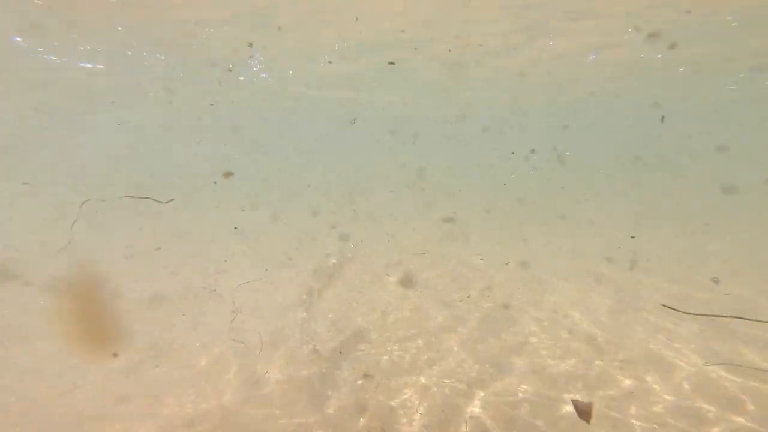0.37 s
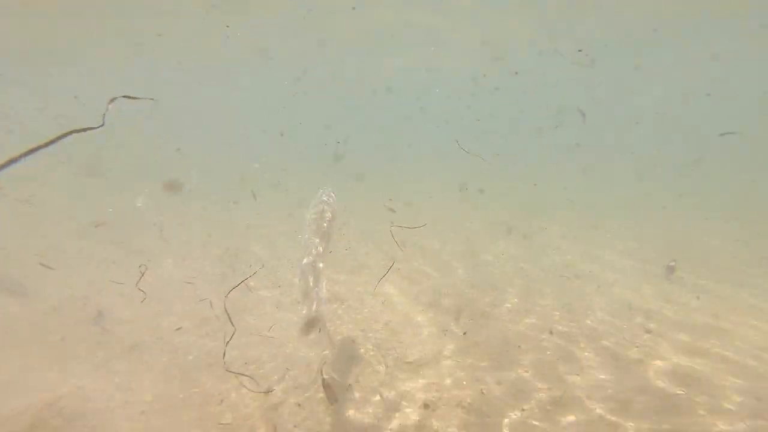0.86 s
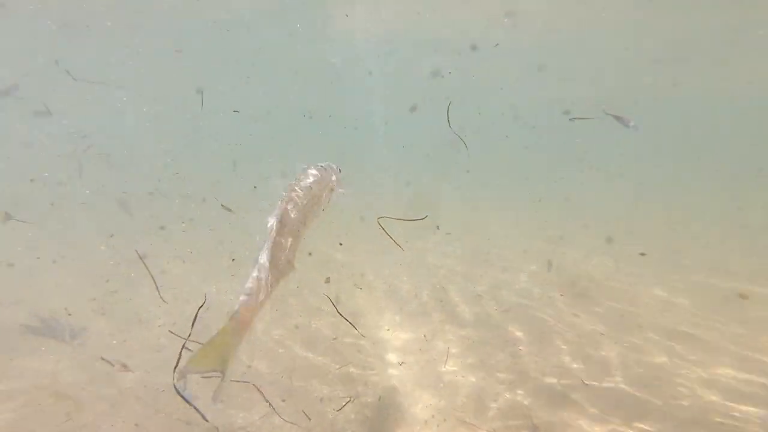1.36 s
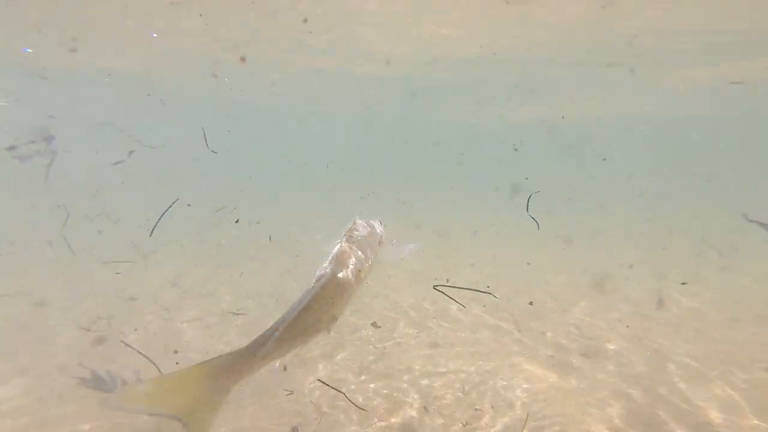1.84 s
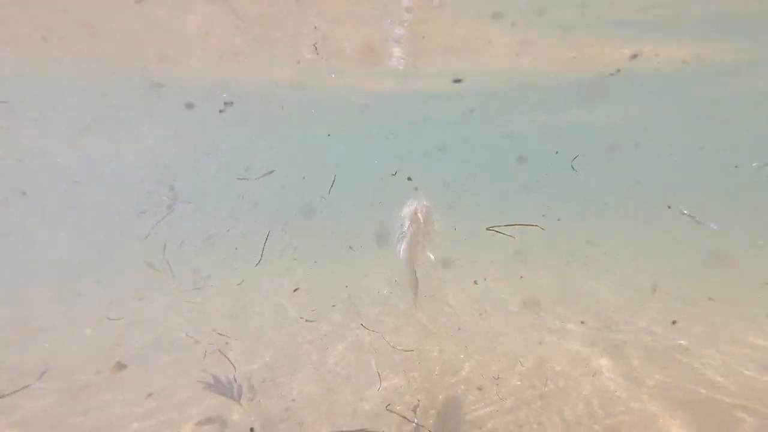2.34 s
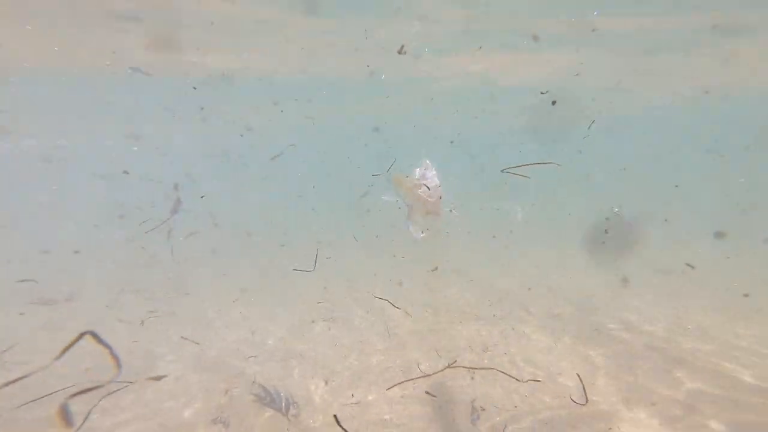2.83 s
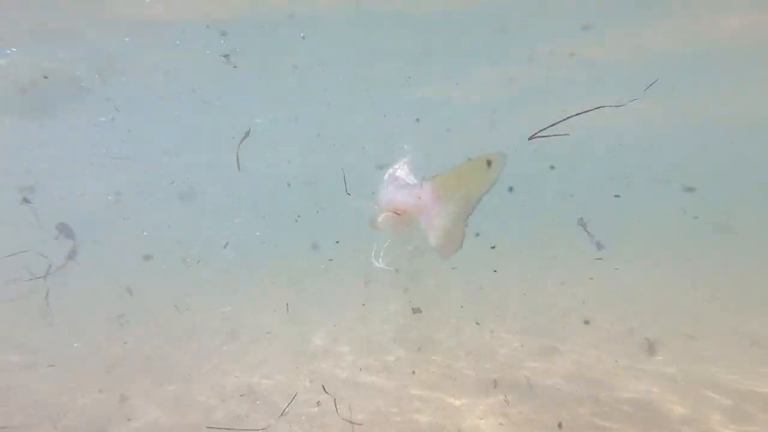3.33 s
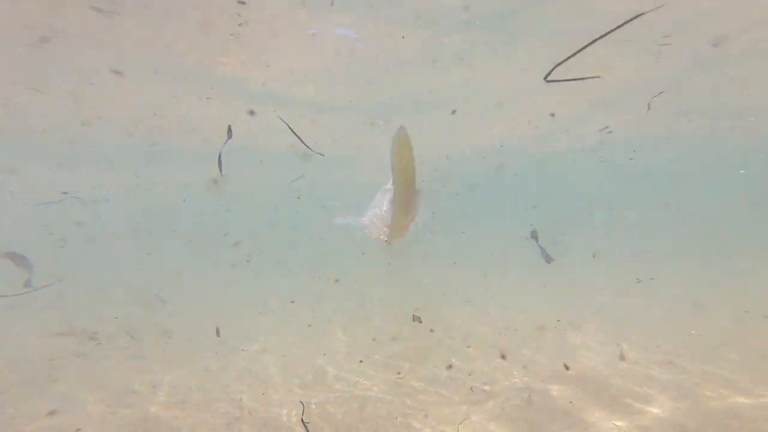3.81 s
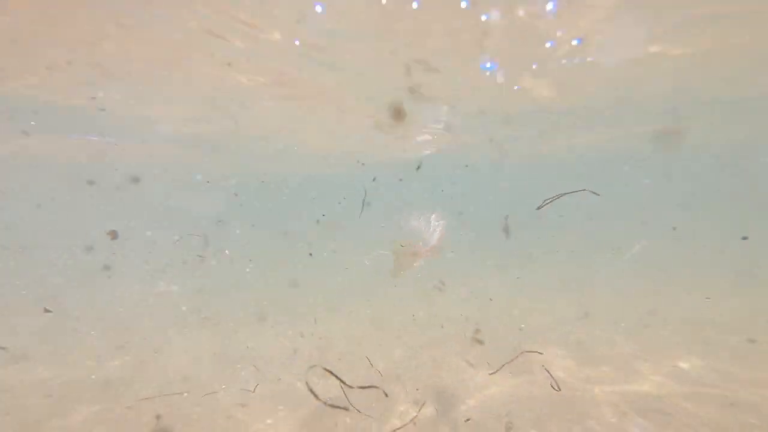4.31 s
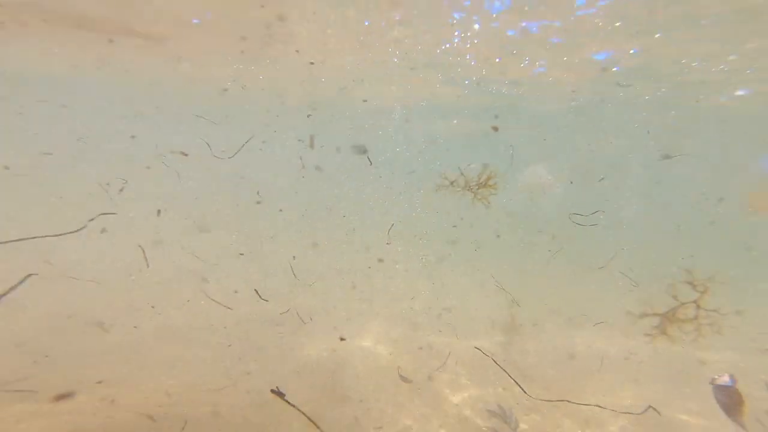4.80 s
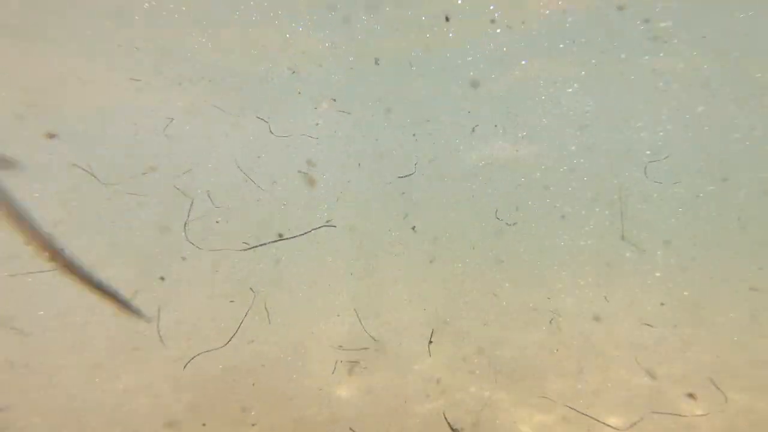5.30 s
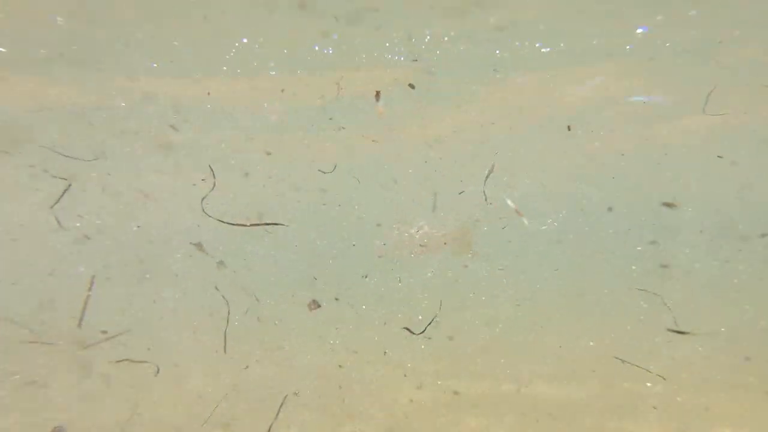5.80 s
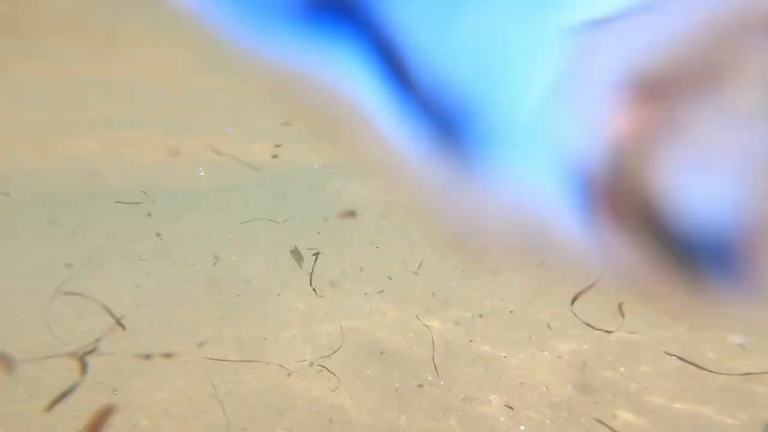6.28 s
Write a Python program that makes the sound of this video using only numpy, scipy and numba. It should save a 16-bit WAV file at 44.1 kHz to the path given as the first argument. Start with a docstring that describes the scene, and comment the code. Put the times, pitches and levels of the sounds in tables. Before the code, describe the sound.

Heard from inside a sealed housing just under the sea surface: low, muffled rumble swells and sloshes while trapped air rings hollowly around one kilohertz. Isolated bloops and glugs come at first, then a quieter lull, a few hollow knocks, and a violent cluster of slaps, thumps and bright clicks around four and a half seconds. More glugging bubbles follow near five, then it sinks to a faint smooth rush with a tick at the end.

```python
"""Surges of a shallow sea push on the microphone membrane of a sealed camera housing just under the surface.
The push is rumbling noise with a grainy slosh above it and a smooth low rush in the lull.
Trapped air, shaken by small knocks, rings at a pitch that follows the water level; water slaps the shell.
Bubbles and glugs are short dying tones, and grit ticks are high rings with a crack of noise.
Foam and sand wash past as clumps of tiny bursts."""
import sys
import numpy as np
from scipy import signal
from scipy.io import wavfile
from numba import njit

SR = 44100
rng = np.random.default_rng(int(sys.argv[2]) if len(sys.argv) > 2 else 0)


def nominal_scale(level):
    """Amplitude ratio for a level in decibels (scalar or array-like)."""
    x = np.asarray(level, float) / 20
    return 10 ** x


def dump(signal):
    """Clip the signal to [-1, 1] and save it as 16-bit WAV at the path in sys.argv[1]."""
    limited = np.clip(np.atleast_2d(signal).T, -1, 1)
    pcm = np.round(limited * 32767).astype(np.int16)
    wavfile.write(sys.argv[1], SR, pcm)


N = 282433  # length in samples

# Uneven push of the swell on the membrane. Each row: time in seconds, rumble gain in dB.
SURGE_CURVE = [(0, -31.5), (.55, -34.5), (.87, -36.5), (1.5, -32), (1.76, -37), (2.1, -33.5), (2.7, -33.5),
               (3.35, -32), (4.3, -31.5), (4.6, -32.5), (4.69, -44.5), (4.95, -47.5), (5.3, -30),
               (5.52, -47.5), (5.86, -47), (6.4, -49)]
# Colour of the rumble. Each row: frequency in Hz, relative strength per Hz in dB.
RUMBLE_COLOUR = [(8.8, -33.5), (15, 2), (43, 4), (65, 5.5), (145, -8), (222, -15), (261, -27), (400, -27.5),
                 (520, -38.5), (880, -120)]
# Single shoves of water. Each row: peak time in seconds, rumble gain in dB,
# time to build up by 20 dB in seconds (values under 0.01 count as 0.01).
SHOVES = [(1.12, -24, 0.18), (2.028, -26, 0.1), (2.62, -28.5, 0.7), (3.03, -33, 0), (4.1, -30.5, 0.13),
          (4.22, -24.5, -0.05), (4.51, -16, 0.06), (4.74, -18.5, 0.08), (4.85, -31, -3.4),
          (5.2, -27.5, 0.4), (5.372, -22, -0.2), (6.11, -32, 0.17), (6.34, -28, 0.15)]
SHOVE_FALL_DB_PER_S = 240.5
# Slosh of the water. Each row: time in seconds, gain in dB.
SLOSH_CURVE = [(0, -45.5), (.16, -48), (.42, -43), (.47, -27.5), (.58, -65), (.87, -44.5), (1.12, -35),
               (1.22, -41), (1.32, -32.5), (1.6, -38.5), (1.77, -48.5), (1.93, -42.5), (2.1, -43),
               (2.39, -49.5), (2.53, -43), (2.61, -22.5), (2.67, -52), (2.96, -50), (3.04, -41.5),
               (3.35, -54.5), (4.01, -50), (4.1, -25.5), (4.21, -30.5), (4.28, -35.5), (4.5, -49),
               (4.57, -55.5), (5.15, -54), (5.26, -40.5), (5.52, -56), (6.15, -47.5), (6.4, -47)]
# Colour of the slosh. Each row: frequency in Hz, relative strength per Hz in dB.
SLOSH_COLOUR = [(88, -28), (150, -6), (392, -7.5), (697, -11.5), (900, -15.5), (1170, -29.5), (1980, -120)]
# Smooth low rush in the lull. Each row: time in seconds, level in dB.
RUSH_CURVE = [(5.7, -74), (5.83, -55), (5.95, -41.5), (6.27, -42), (6.32, -60)]
# Band of the rush: lower edge in Hz, upper edge in Hz.
RUSH_BAND_HZ = [130, 408]

# How strongly the air pocket in the port rings. Each row: time in seconds, gain in dB.
POCKET_CURVE = [(0, -64), (.19, -36), (.27, -46), (.31, -52), (.365, -41), (.38, -35), (.6, -36.5),
                (.69, -51), (.89, -38.5), (1.24, -37), (1.3, -20.5), (1.5, -35.5), (2.46, -51.5),
                (2.7, -37), (2.77, -57.5), (3.06, -39), (3.3, -55), (3.65, -38), (4.03, -40), (4.09, -27),
                (4.37, -39), (4.56, -63.5), (4.87, -39.5), (4.935, -47), (4.96, -39), (5.13, -38),
                (5.2, -31), (5.28, -34), (5.4, -40), (5.62, -52), (6.26, -55), (6.38, -33)]
# Pitch of the air pocket, before a small wobble. Each row: time in seconds, pitch in Hz.
POCKET_PITCH = [(0, 1083), (.2, 1260), (.28, 1600), (.33, 1300), (.37, 1166), (1.28, 1085), (1.5, 1086),
                (2.7, 1133), (3.6, 1088), (3.8, 943), (3.92, 1036), (4.4, 1135), (4.7, 1038), (4.95, 905),
                (5.13, 910), (5.24, 808), (5.43, 943), (6.26, 954), (6.4, 1141)]
# The pocket rings more purely once the housing has dipped again.
# Each row: time in seconds, width in Hz of each of its two resonances in a row.
POCKET_WIDTH = [(0, 246.4), (4.7, 268), (4.88, 101), (6.2, 70.6), (6.4, 254)]
# More air spaces that ring for a while as the housing nears the surface and dips again, one list each.
# Each row: time in seconds, pitch in Hz, gain in dB.
SIDE_POCKETS = [
    [(0.28, 2500, -68), (0.335, 2346, -61), (0.49, 2444, -67)],
    [(4.72, 3620, -88), (5.2, 3650, -74.5)],
    [(4.36, 1895, -60), (4.42, 2000, -40), (4.47, 2170, -47), (4.52, 2160, -54), (4.6, 2030, -51.5),
     (4.7, 1930, -48.5), (4.74, 1810, -37.5), (4.8, 1510, -60), (4.86, 1510, -60.5), (4.93, 1600, -80)],
    [(4.56, 3750, -83), (4.63, 3650, -49), (4.66, 3430, -65), (4.705, 3600, -40), (4.73, 3740, -60)],
    [(4.8, 677, -34), (4.86, 686, -30.5), (4.93, 652, -57), (4.96, 664, -37.5), (5.11, 667, -45),
     (5.278, 738, -51.5), (5.336, 609, -49), (5.42, 690, -58)],
]
# Width in Hz of each resonance, one value for each side pocket.
SIDE_WIDTHS_HZ = [39.6, 110, 260, 600, 75]
# Rough sound let through below the pitch: dB relative to the ring, one value for each side pocket.
SIDE_BODY_DB = [-30, -30, 1, -10, -12]

# Water slapping the shell. Each row: start in seconds, dull noise in dB and bright noise in dB
# (both before filtering), time to die by 60 dB in seconds.
SLAPS = [(0.24, -22, -25, 0.095), (0.377, -21, -62, 0.06), (1.237, -30, -34, 0.024),
         (1.289, -12, -33, 0.019), (2.059, -23, -40, 0.05), (2.075, -32, -35, 0.017),
         (2.09, -24, -30, 0.012), (2.19, -21, -38, 0.056), (2.287, -16, -44, 0.015),
         (3.109, -29.5, -30, 0.022), (3.613, -23, -62, 0.041), (3.671, -22.5, -48, 0.061),
         (3.689, -25.5, -47, 0.088), (3.794, -13, -57, 0.015), (3.837, -2, -50, 0.015),
         (4.043, -16.5, -43.5, 0.061), (4.105, -5, -67, 0.02), (4.383, 0, -31, 0.0049),
         (4.434, -31, -18, 0.011), (4.474, -10.5, -28, 0.051), (4.486, -15.5, -23, 0.014),
         (4.509, -18.5, -52, 0.062), (4.526, -19, -46, 0.029), (4.554, -9, -50, 0.017),
         (4.588, -39, -14.5, 0.01), (4.625, -42.5, -17, 0.0051), (4.633, -40, -18, 0.0092),
         (4.639, -19, -28, 0.031), (4.694, -2.5, -19, 0.011), (4.704, -25, -23, 0.02),
         (4.716, -16, -47, 0.0098), (4.751, 6.5, -46, 0.0081), (4.843, -6.5, -40, 0.022),
         (4.853, -8, -50, 0.0069), (5.169, -26, -82, 0.022), (5.23, -7, -44, 0.022),
         (5.717, -26, -52, 0.029), (6.218, -36.5, -45, 0.082), (6.371, -34, -22, 0.027)]
SLAP_RISE_S = 0.0003
# Each slap also shakes the pocket for a moment.
SLAP_TO_POCKET_DB, POCKET_AFTER_T60_S, POCKET_AFTER_RISE_S = -17.5, 0.067, 0.00095

# Bubbles and rings of trapped air. Each row: rough time in seconds, peak in dB before wobble,
# starting pitch in Hz, time to die by 60 dB in seconds.
BUBBLES = [(0.183, -26, 1250, 0.019), (0.377, -24, 1080, 0.026), (0.898, -31, 1150, 0.13),
           (1.147, -28, 874, 0.068), (1.254, -23.5, 820, 0.022), (1.294, -27.5, 1077, 0.073),
           (1.307, -10.5, 1045, 0.03), (1.336, -21.5, 1167, 0.13), (1.377, -28, 1175, 0.07),
           (1.515, -24, 1156, 0.03), (1.695, -30, 1217, 0.03), (1.732, -28, 1280, 0.032),
           (1.85, -31.5, 676, 0.091), (1.921, -28, 1151, 0.089), (2.055, -29.5, 990, 0.037),
           (3.318, -27, 1111, 0.088), (3.329, -14, 1156, 0.06), (3.329, -31.5, 1705, 0.03),
           (3.64, -33.5, 484, 0.08), (3.794, -9.5, 743, 0.036), (3.797, -35, 1518, 0.086),
           (3.81, -22, 645, 0.092), (3.836, -18.5, 1250, 0.028), (3.854, -19, 1006, 0.03),
           (3.997, -29, 796, 0.035), (4.045, -19, 710, 0.022), (4.073, -24.5, 1186, 0.082),
           (4.124, -18, 910, 0.019), (4.15, -19.5, 750, 0.032), (4.384, -17, 1285, 0.024),
           (4.436, -15, 1737, 0.018), (4.474, -28, 1090, 0.026), (4.695, -12, 1092, 0.034),
           (4.732, -21.5, 953, 0.045), (4.743, -8, 940, 0.035), (4.756, -10.5, 729, 0.076),
           (4.774, -16, 744, 0.13), (4.841, -17.5, 1013, 0.027), (4.852, -36.5, 1490, 0.07),
           (4.919, -50, 1750, 0.04), (4.953, -29.5, 932, 0.045), (4.992, -27, 850, 0.12),
           (5.098, -24, 967, 0.027), (5.155, -25, 885, 0.13), (5.167, -8.5, 884, 0.063),
           (5.17, -11, 704, 0.061), (5.233, -11.5, 922, 0.076), (5.266, -9.5, 870, 0.044),
           (5.284, -14, 900, 0.096), (5.325, -17, 918, 0.066), (5.568, -33.5, 943, 0.039),
           (6.376, -26, 1358, 0.039)]
BUBBLE_RISE_SHARE = .075  # of the dying time: bubbles that ring long also swell slowly
# Low glugs and short thumps of trapped air. Each row: rough time in seconds, peak in dB before wobble,
# starting pitch in Hz, time to die by 60 dB in seconds (held to 0.2 at most).
GLUGS = [(0.46, -27, 265, 0.092), (1.091, -25, 300.5, 0.26), (1.248, -31.5, 600, 0.071),
         (1.34, -26, 465, 0.04), (1.546, -24.5, 290.6, 0.22), (1.61, -31, 332.3, 0.17),
         (1.678, -29.5, 140, 0.07), (1.803, -28.5, 154, 0.096), (1.885, -20, 396, 0.06),
         (1.997, -30, 457, 0.041), (2.427, -21.5, 110, 0.026), (2.526, -23.5, 138, 0.17),
         (2.535, -23, 387, 0.014), (2.583, -13, 99, 0.15), (2.601, -18, 196, 0.016),
         (2.753, -27, 135, 0.04), (3.036, -23, 185.5, 0.04), (3.796, -14.5, 190, 0.0065),
         (3.837, -18, 197, 0.011), (3.913, -22, 110, 0.049), (4.047, -20.5, 208, 0.046),
         (4.116, -19, 207, 0.083), (4.172, -22, 224, 0.13), (4.419, -14, 89, 0.07),
         (4.449, -21, 129, 0.066), (4.475, -13, 117, 0.03), (4.513, -3.5, 128, 0.023),
         (4.524, -8, 69, 0.12), (4.549, -11, 190, 0.0195), (4.647, -15, 138, 0.029),
         (4.717, -12, 75.4, 0.1), (4.72, -23, 422, 0.038), (4.749, -8, 157, 0.0091),
         (4.774, -15, 130, 0.028), (4.852, -11.5, 173, 0.0083), (4.992, -31, 147, 0.0087),
         (5.141, -31.5, 130, 0.04), (5.171, -23.5, 108, 0.027), (5.227, -16, 178, 0.043),
         (5.297, -22.5, 121, 0.05), (5.328, -10, 66, 0.097), (5.935, -28.5, 198, 0.034)]
# Small bubbles and grit snapping at the shell. Each row: start in seconds, peak of the ring in dB,
# starting pitch in Hz, crack in dB before its fade and filter.
TICKS = [(0.2408, -21.5, 1770, -34.5), (1.342, -33, 2750, -52), (1.366, -31, 2890, -70),
         (1.548, -39, 2750, -42), (1.587, -38.5, 3000, -59), (1.669, -44.5, 3900, -57),
         (1.817, -42.5, 2670, -66), (1.875, -43, 2970, -62), (2.44, -54, 6360, -65),
         (2.5979, -42, 3600, -32), (2.6525, -39, 4000, -22), (2.7085, -48, 4700, -44.5),
         (2.9, -46, 2750, -56), (2.978, -48.5, 3400, -61), (3.083, -47, 3860, -61), (3.107, -42, 2740, -48),
         (3.143, -53, 2900, -67.5), (3.217, -49.5, 2770, -69), (3.914, -41, 2780, -66),
         (4.3798, -22, 2570, -60), (4.38, -41, 4630, -67), (4.4, -16.5, 2520, -50.5),
         (4.424, -16.5, 2200, -50), (4.4327, -15, 2360, -29), (4.4737, -18, 2230, -48.5),
         (4.4848, -16, 2660, -40), (4.5316, -36, 3860, -36), (4.588, -22, 2130, -52),
         (4.6243, -19, 2570, -52), (4.632, -23.5, 2650, -51), (4.683, -30, 2080, -58),
         (4.851, -46.5, 4940, -49.5), (4.966, -48.5, 4040, -63), (5.241, -37, 4500, -46),
         (6.3811, -21, 3360, -60)]
TICK_CYCLES = 32  # cycles in which a tick dies by 60 dB

# Foam and sand washing past. Each row: time in seconds, fizz gain in dB, fine hiss gain in dB.
WASH_CURVES = [(0, -44.5, -58.5), (.12, -111, -81), (.18, -50, -49.5), (.24, -36, -57.5), (.3, -52, -61.5),
               (.36, -68.5, -58), (.66, -79, -79), (.94, -50.5, -59), (1.12, -80, -71.5), (1.2, -49, -67),
               (1.23, -50.5, -67.5), (1.29, -35, -62.5), (1.41, -37, -64), (1.6, -46.5, -69),
               (1.68, -55.5, -77.5), (1.78, -57.5, -72.5), (1.87, -49, -75), (2.02, -57.5, -73),
               (2.17, -46.5, -70.5), (2.3, -48, -64.5), (2.33, -72, -89), (2.62, -57.5, -54.5),
               (2.8, -57.5, -80.5), (3.05, -55, -74.5), (3.32, -63.5, -80.5), (3.6, -54.5, -76.5),
               (3.68, -39.5, -74), (3.74, -53.5, -73.5), (4.02, -49.5, -77.5), (4.09, -42, -62.5),
               (4.35, -50.5, -76), (4.42, -38, -75.5), (4.53, -51, -63), (4.57, -79, -83),
               (4.71, -48.5, -70), (4.81, -73.5, -93), (5.18, -67, -79.5), (5.25, -52, -67.5),
               (5.6, -66.5, -89.5), (6.3, -68, -73.5), (6.35, -47, -54), (6.4, -32.5, -63)]
# Colour of the fizz. Each row: frequency in Hz, relative strength per Hz in dB.
FIZZ_COLOUR = [(1400, 2), (1700, 17.5), (2200, -11), (2800, -3), (3500, -5), (4300, -13), (5000, -30)]
# Colour of the hiss. Each row: frequency in Hz, relative strength per Hz in dB.
HISS_COLOUR = [(3800, 2), (4300, 9.5), (5100, 8.5), (6000, 1.5), (8500, -3.5), (11000, -11), (13000, -24),
               (16000, -36)]
# Resonances of the housing. Each row: pitch in Hz, width in Hz, level in dB before flicker.
SHELL_MODES = [(1666, 540, 3.5), (2720, 350, -2.5), (3590, 130, -10.5), (4006, 500, -22)]


def rms_one(x):
    """Scale to rms 1."""
    return x / np.sqrt(np.mean(x ** 2) + 1e-20)


def in_time(rows):
    """Columns of a curve, one value a sample."""
    s, *columns = np.transpose(rows)
    return [np.interp(np.arange(N) / SR, s, column) for column in columns]


def drift(rate_hz):
    """Slow random wandering with spread 1: smoothed noise, made at every 20th sample."""
    r = np.exp(-40 * np.pi * rate_hz / SR)
    noise = rng.standard_normal(N // 20 + 3002)
    slow = signal.lfilter([1], [1, -2 * r, r * r], noise)[3000:]  # skip the filter settling
    return np.interp(np.arange(N) / 20, np.arange(len(slow)), rms_one(slow))


def grains(per_s, spread_db):
    """Random clicks of uneven size; rms 1."""
    size_db = spread_db * np.minimum(rng.exponential(1, N), 3)
    sizes = nominal_scale(size_db) * rng.choice([-1, 1], N)
    return rms_one(sizes * (rng.random(N) < per_s / SR))


def coloured(source, spectrum, patchy_db, patch_rate):
    """Third-octave bands of two sources in turn, each band flickering partly with the others; rms 1."""
    hz, level_db = np.transpose(spectrum)
    edges = hz[0] * 2 ** np.arange(0, np.log2(hz[-1] / hz[0]) + .01, 1 / 3)
    out, together = 0, drift(patch_rate)
    for k, (low, high) in enumerate(zip(edges, edges[1:])):
        sos = signal.butter(2, [low, high], "band", fs=SR, output="sos")
        band = signal.sosfilt(sos, source[k % 2])
        centre_db = np.interp(np.log(low * high) / 2, np.log(hz), level_db)
        flicker_db = patchy_db * (0.36 * together + drift(patch_rate))
        out = out + band * nominal_scale(centre_db + flicker_db)
    return rms_one(out)


@njit
def moving_resonance(x, hz, r, rate):
    """Two-pole resonance, gain 1 on top, whose centre and width move sample by sample."""
    y = np.zeros_like(x)
    for i in range(2, len(x)):
        drive = (1 - r[i] ** 2) / 2 * (x[i] - x[i - 2])
        y[i] = drive + 2 * r[i] * np.cos(2 * np.pi * hz[i] / rate) * y[i - 1] - r[i] ** 2 * y[i - 2]
    return y


def ringing(knocks, hz, width_hz):
    """An air space rings steeply around its pitch, at even power whatever its width; rms 1."""
    width_hz = np.clip(width_hz, 20, 2000) * np.ones(N)
    r = np.exp(-np.pi * width_hz / SR)
    once = moving_resonance(knocks, hz, r, SR)
    twice = moving_resonance(once, hz, r, SR)
    return rms_one(twice / np.sqrt(width_hz))


def add(out, s, wave):
    """Mix a wave in at time s."""
    i = round(s * SR)
    out[i:i + len(wave)] += wave[:N - i]


def pop(hz, t60, rise_s, glide):
    """A dying sine of peak near 1 whose pitch slides up as the bubble changes shape."""
    t60 = np.clip(t60, .004, .2)
    t = np.arange(int((t60 + 4 * rise_s) * SR)) / SR
    shape = (1 - np.exp(-t / max(rise_s, 1e-4))) ** 2 * nominal_scale(-60 * t / t60)
    tone = np.sin(2 * np.pi * hz * (t + glide * t ** 2 / t60))
    return shape / shape.max() * tone


def surge():
    """Lumpy pressure noise and, above it, the slosh of water in soft grains."""
    (rumble_db,), (slosh_db,) = in_time(SURGE_CURVE), in_time(SLOSH_CURVE)
    rumble = coloured(rng.standard_normal((2, N)), RUMBLE_COLOUR, patchy_db=1.2, patch_rate=12)
    lumps = [grains(250, 4.5) + .6 * rng.standard_normal(N) for k in range(2)]
    slosh = coloured(lumps, SLOSH_COLOUR, patchy_db=3.5, patch_rate=15)
    push = np.hypot(nominal_scale(rumble_db), nominal_scale(shoves_db()))  # swell and shoves add as powers
    return push * rumble + nominal_scale(slosh_db) * slosh + rush()


def shoves_db():
    """Each shove builds up at its own pace and lets go quickly; the strongest one counts."""
    t, out = np.arange(N) / SR, np.full(N, -120.)
    for s, db, build_s in SHOVES:
        building_db = 20 * (s - t) / max(build_s, .01)
        falling_db = SHOVE_FALL_DB_PER_S * (t - s)
        out = np.maximum(out, db - np.where(t < s, building_db, falling_db))
    return out


def rush():
    """Even noise in one low band swells and fades."""
    level_db, = in_time(RUSH_CURVE)
    band = signal.butter(5, RUSH_BAND_HZ, "band", fs=SR, output="sos")
    noise = rms_one(signal.sosfilt(band, rng.standard_normal(N)))
    started = np.arange(N) / SR > RUSH_CURVE[0][0]
    return started * nominal_scale(level_db) * noise


def pocket():
    """Small knocks of water keep the trapped air ringing, and slaps shake it harder."""
    (hz,), (level_db,), (width_hz,) = in_time(POCKET_PITCH), in_time(POCKET_CURVE), in_time(POCKET_WIDTH)
    knocks = grains(400, 4.5) + rng.standard_normal(N)
    gusty = knocks * nominal_scale(3.5 * np.sqrt(width_hz / width_hz.max()) * drift(20))
    wobbling_hz = hz + 0.3 * width_hz * drift(25.4)
    ring = ringing(gusty, wobbling_hz, width_hz)
    soft_ring = signal.sosfilt(signal.butter(2, 2000, fs=SR, output="sos"), ring)  # low-pass
    return np.hypot(nominal_scale(level_db), after_slaps()) * soft_ring + side_pockets(knocks)


def side_pockets(knocks):
    """The same knocks ring other air spaces for a while, with a rougher sound below each pitch."""
    t, out = np.arange(N) / SR, np.zeros(N)
    for rows, width_hz, body_db in zip(SIDE_POCKETS, SIDE_WIDTHS_HZ, SIDE_BODY_DB):
        hz, level_db = in_time(rows)
        # fade in and out over 33 ms
        present = np.clip(np.minimum(t - rows[0][0], rows[-1][0] - t) / 0.033, 0, 1)
        body = nominal_scale(body_db) * ringing(knocks, .74 * hz, .4 * hz)
        flicker = nominal_scale(3.5 * drift(25))
        out += present * nominal_scale(level_db) * (flicker * ringing(knocks, hz, width_hz) + body)
    return out


def after_slaps():
    """Strength of the slaps as it builds, lingers and dies in the pocket."""
    hits = np.zeros(N)
    for s, db, *rest in SLAPS:
        hits[round(s * SR)] = nominal_scale(db + SLAP_TO_POCKET_DB)
    dying = signal.lfilter([1], [1, -nominal_scale(-60 / (POCKET_AFTER_T60_S * SR))], hits + 1e-18)
    r = np.exp(-1 / (POCKET_AFTER_RISE_S * SR))
    return signal.lfilter([(1 - r) ** 2], [1, -2 * r, r * r], dying)  # softens the onset


def slaps():
    """Water hits the shell: a burst of dull noise that dies fast, with a brighter spatter."""
    out, t = np.zeros(N), np.arange(3000) / SR
    noise = rng.standard_normal((len(SLAPS), 2, 3000))
    dull = signal.butter(6, [150, 1700], "band", fs=SR, output="sos")
    bright = signal.butter(8, [1800, 4500], "band", fs=SR, output="sos")
    for (s, db, bright_db, t60), pair in zip(SLAPS, noise):
        low, high = pair * (1 - np.exp(-t / SLAP_RISE_S)) * nominal_scale(-60 * t / t60)
        thud = nominal_scale(db) * signal.sosfilt(dull, low)
        spatter = nominal_scale(bright_db) * signal.sosfilt(bright, high)
        add(out, s, thud + spatter)
    return out


def bubbles():
    """Bubbles and glugs ring as dying tones, made unsteady by the churning water."""
    out = np.zeros(N)
    for s, db, hz, t60 in BUBBLES:
        rise_s = BUBBLE_RISE_SHARE * t60
        start = s + 0.002024 - 1.5 * rise_s  # slow swells start earlier
        add(out, start, nominal_scale(db) * pop(hz, t60, rise_s, glide=0.024))
    for s, db, hz, t60 in GLUGS:
        add(out, s - .003, nominal_scale(db) * pop(hz, t60, 0.0034, glide=0.048))
    return out * (1 + .18 * drift(90))


def ticks():
    """Small bubbles and grit give a short high ring with a broad crack at its start."""
    out, noise = np.zeros(N), rng.standard_normal((len(TICKS), 260))
    band = signal.butter(2, [1800, 8000], "band", fs=SR, output="sos")
    fade = nominal_scale(-60 * np.arange(260) / SR / 0.011)
    cracks = signal.sosfilt(band, noise * fade)
    for (s, db, hz, crack_db), crack in zip(TICKS, cracks):
        add(out, s, nominal_scale(db) * pop(hz, TICK_CYCLES / hz, .0007, glide=.03))
        add(out, s, nominal_scale(crack_db) * crack)
    return out


def wash():
    """Dense tiny bursts: fizz and droplets in the middle, smoother hiss on top, coming in clumps."""
    fizz_db, hiss_db = in_time(WASH_CURVES)
    clumps, puffs = nominal_scale(2.6 * drift(40)), nominal_scale(3.5 * drift(40))
    bursts = [grains(700, 3.4) + 0.76 * rng.standard_normal(N) for k in range(2)]
    fizz = coloured(bursts, FIZZ_COLOUR, patchy_db=2.5, patch_rate=25)
    hiss = coloured(bursts, HISS_COLOUR, patchy_db=1.5, patch_rate=20)
    middle = nominal_scale(-7.5) * fizz + nominal_scale(-8.5) * shell(bursts[0]) + nominal_scale(-5.5) * droplets()
    middle = signal.sosfilt(signal.butter(8, 4650, fs=SR, output="sos"), middle)  # low-pass
    return clumps * nominal_scale(fizz_db) * middle + np.sqrt(clumps) * puffs * nominal_scale(hiss_db) * hiss


def droplets():
    """Tiny bubbles at random pitches, each ringing a few dozen cycles; rms 1."""
    clicks, out = grains(120, 5.5), 0
    pitches, dealt = np.geomspace(1500, 4600, 16), rng.integers(0, 16, N)
    for k, hz in enumerate(pitches):
        r = nominal_scale(-60 * hz / (40.0 * SR))  # dies by 60 dB in 40 cycles
        w = 2 * np.pi * hz / SR
        own_clicks = clicks * (dealt == k) + 1e-18
        ring = signal.lfilter([0, np.sin(w)], [1, -2 * r * np.cos(w), r * r], own_clicks)
        out = out + ring * 1500 / hz  # higher ones are weaker
    return rms_one(signal.lfilter([.3], [1, -.75], out))  # dulls the treble


def shell(x):
    """The resonances of the housing, each flickering a little; rms 1."""
    out = 0
    for hz, width_hz, level_db in SHELL_MODES:
        flickering = nominal_scale(level_db + 4 * drift(30))
        out = out + flickering * ringing(x, np.full(N, float(hz)), width_hz)
    return rms_one(out)


def scene():
    """All sources reach one microphone."""
    return (surge() + pocket() + slaps() + bubbles() + ticks() + wash())[None]


def low_pass(x):
    """Removes everything above the highest recorded frequency."""
    return signal.sosfilt(signal.butter(12, 15800, fs=SR, output="sos"), x)


def record(dry):
    """The finished mix, from one microphone behind a membrane."""
    return low_pass(dry)


dry = scene()
out = record(dry)
dump(out)
```